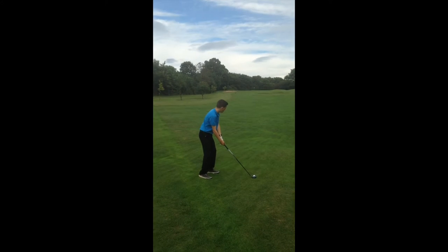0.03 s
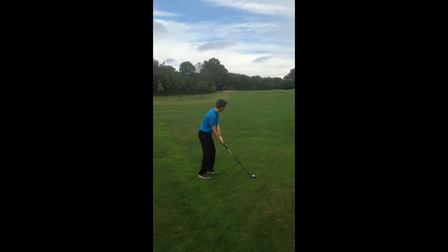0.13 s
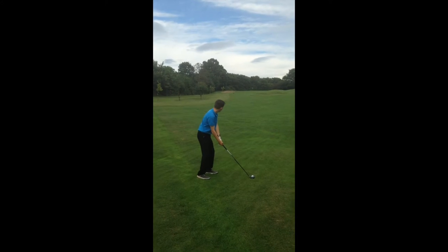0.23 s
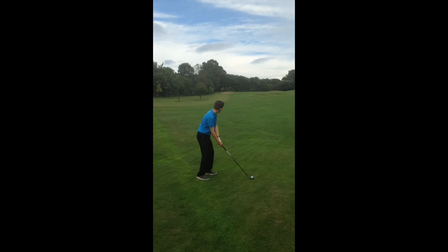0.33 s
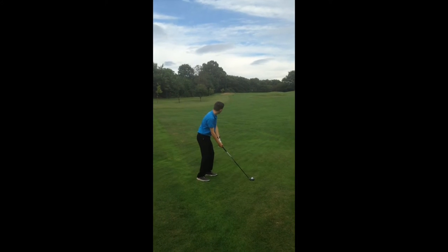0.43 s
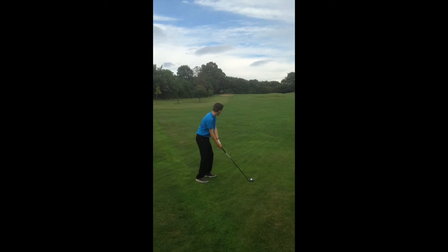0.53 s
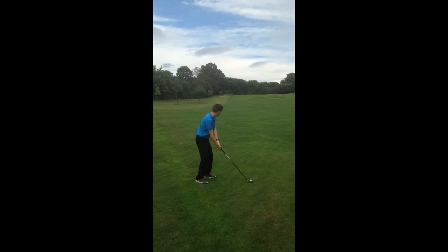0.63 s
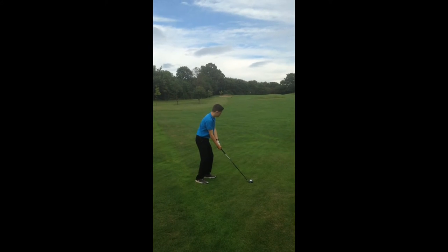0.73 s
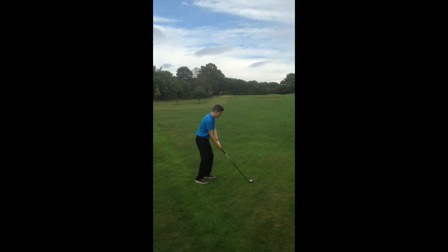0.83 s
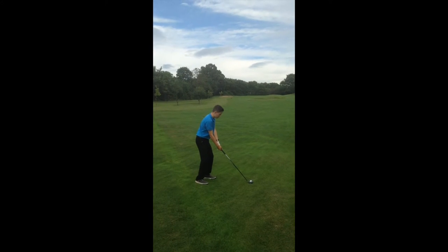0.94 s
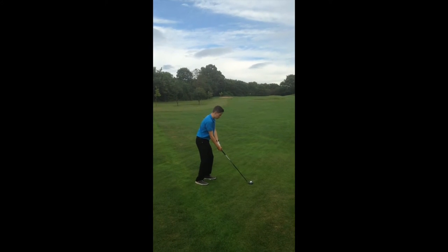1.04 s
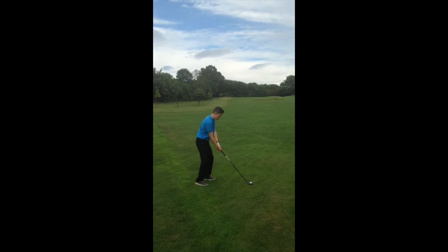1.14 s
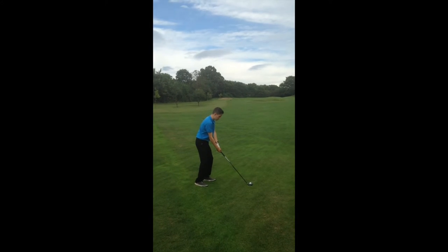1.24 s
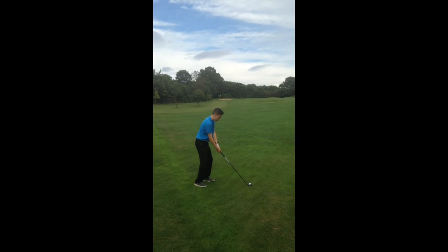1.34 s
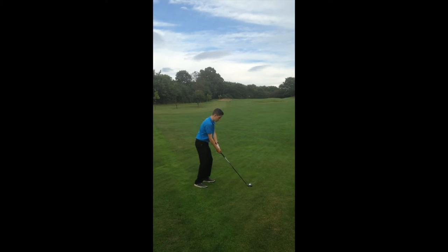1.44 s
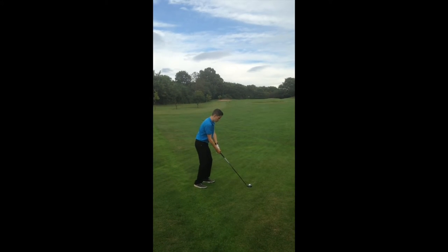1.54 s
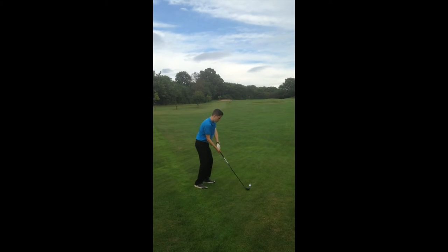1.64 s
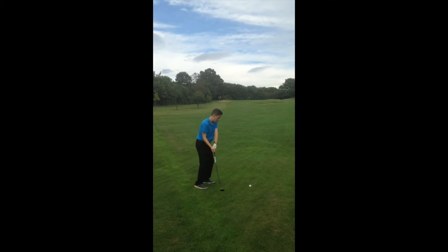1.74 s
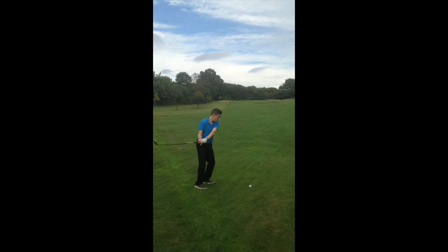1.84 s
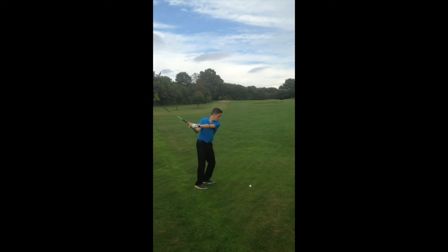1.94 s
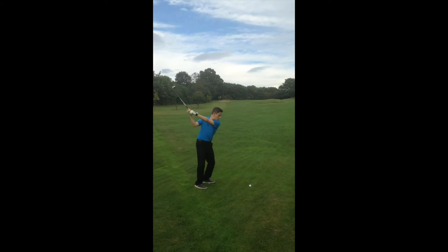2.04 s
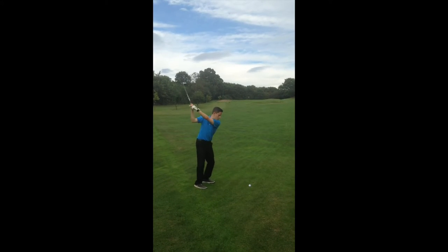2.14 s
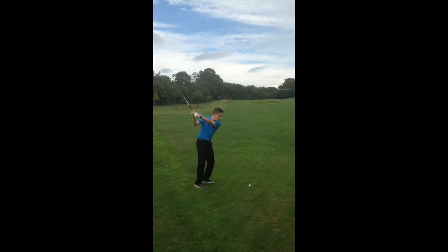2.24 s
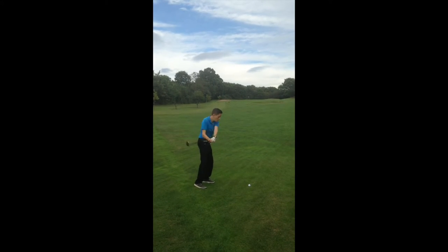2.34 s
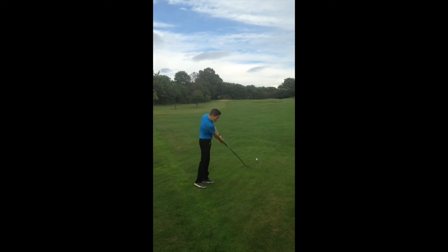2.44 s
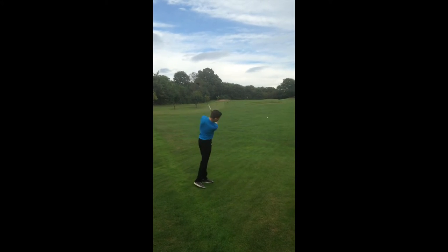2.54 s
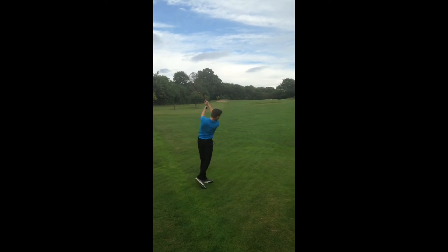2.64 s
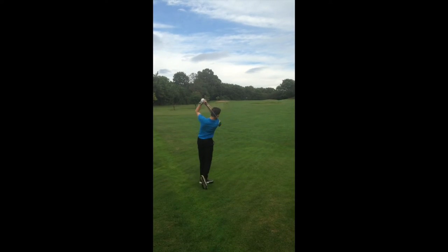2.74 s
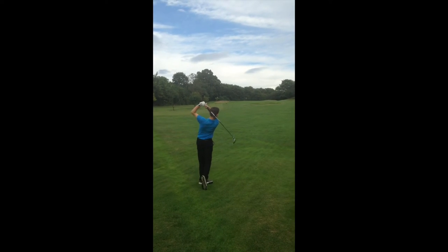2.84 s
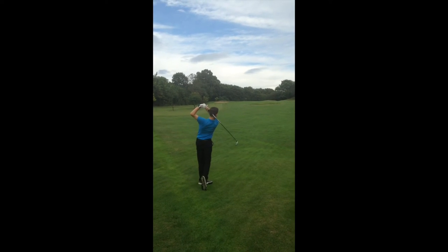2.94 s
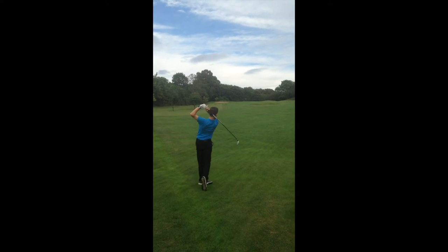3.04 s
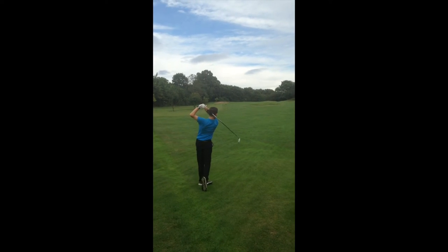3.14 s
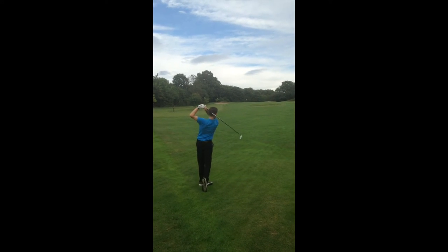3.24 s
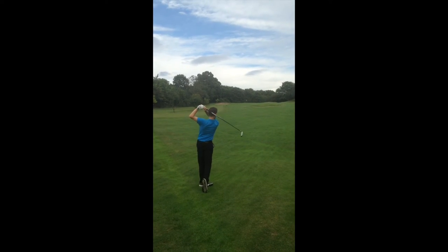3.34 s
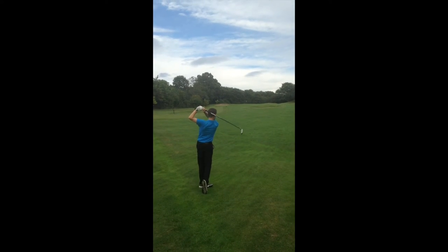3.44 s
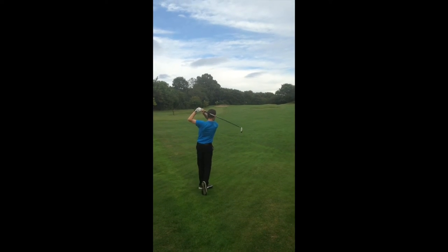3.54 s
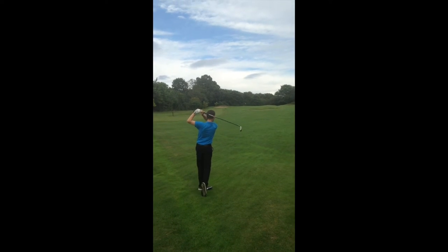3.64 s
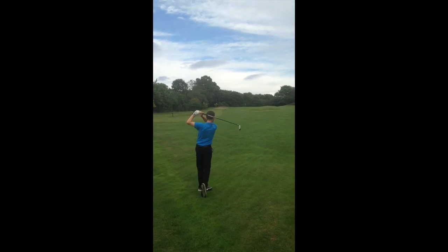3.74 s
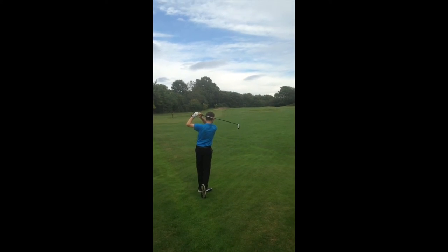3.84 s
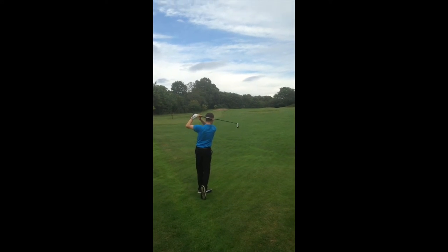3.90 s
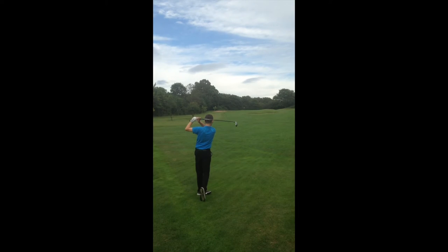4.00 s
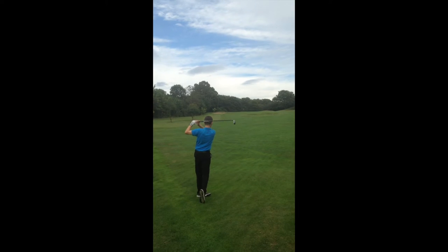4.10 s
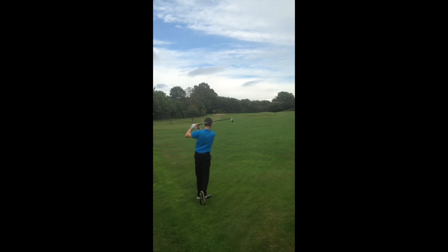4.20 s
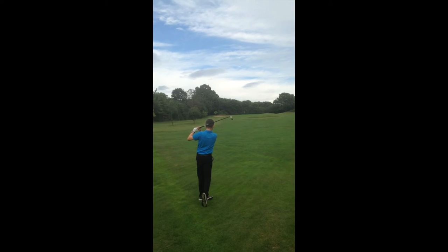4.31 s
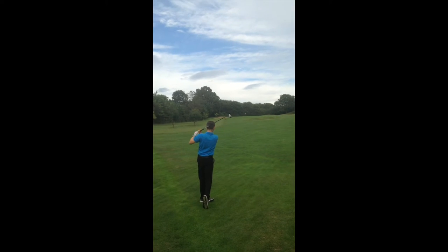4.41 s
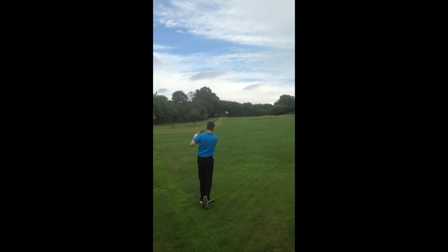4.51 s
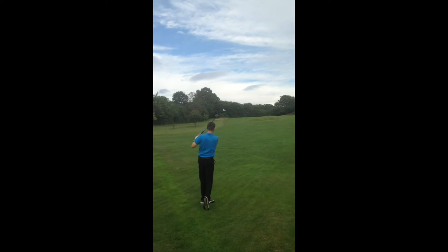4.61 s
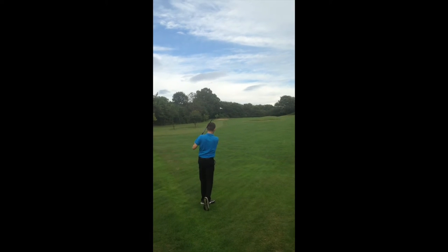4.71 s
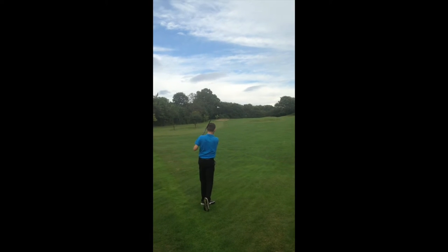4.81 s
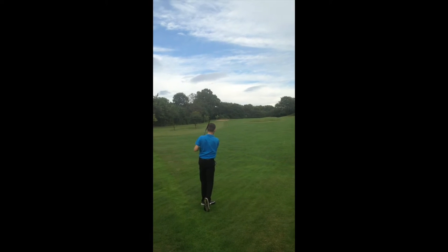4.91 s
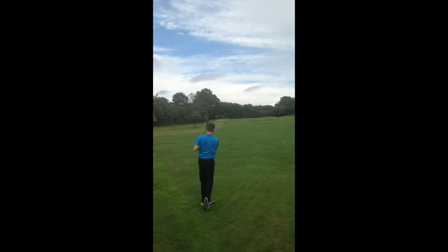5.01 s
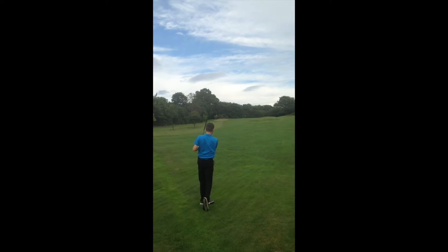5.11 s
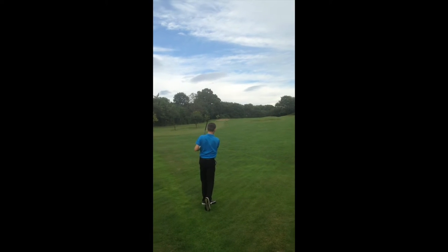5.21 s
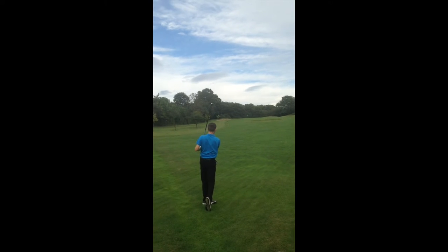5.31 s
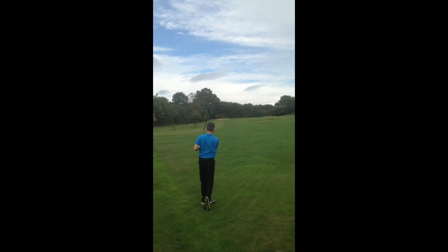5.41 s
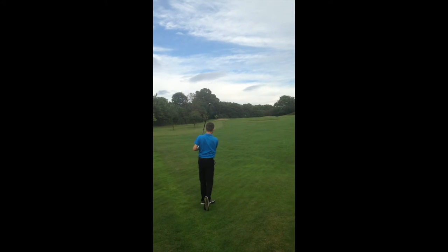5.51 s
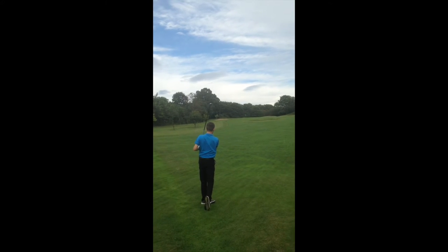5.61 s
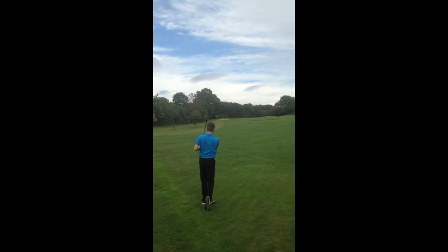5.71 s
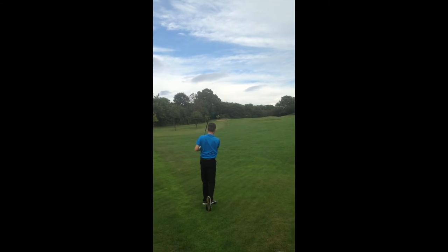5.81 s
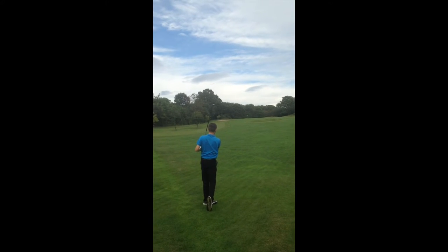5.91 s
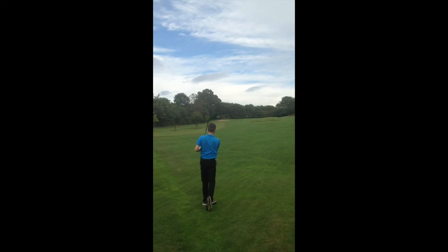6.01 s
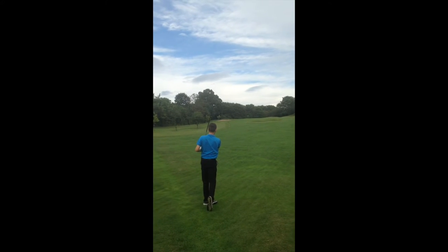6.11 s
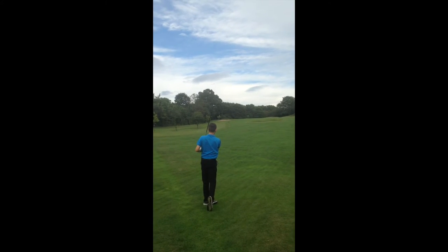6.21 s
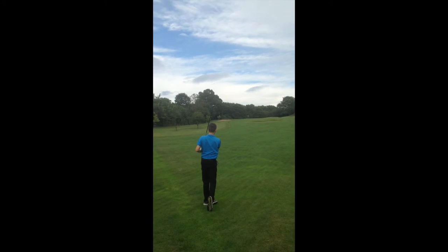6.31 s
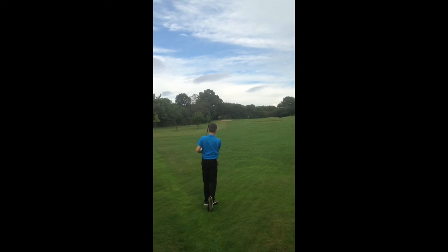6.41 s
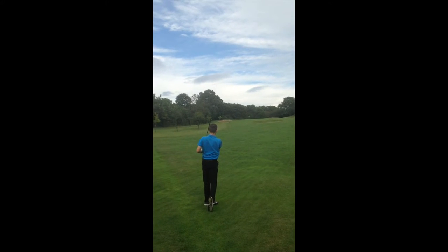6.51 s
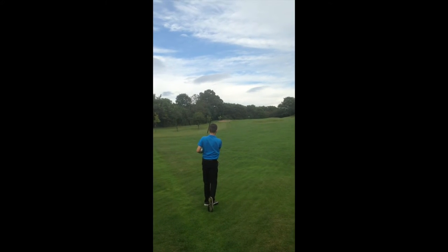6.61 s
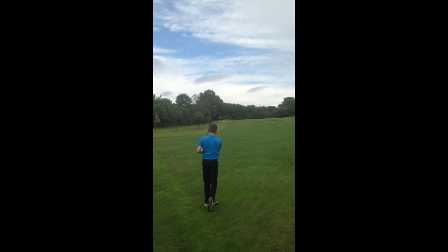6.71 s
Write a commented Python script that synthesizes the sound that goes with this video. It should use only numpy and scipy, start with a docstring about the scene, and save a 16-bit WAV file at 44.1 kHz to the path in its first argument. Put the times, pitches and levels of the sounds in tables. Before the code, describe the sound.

Outdoors on an open fairway, a distant mower drones low with a wavering, fluttering rattle. Clothing rustles faintly, then a short swish leads into one very sharp, bright click of iron on ball with a tiny metallic ring. A whisper of torn grass follows. The mower recedes while the hand-held phone, a few metres away, picks up soft bumps.

```python
"""Iron shot on an open fairway

A golfer hits one iron shot a few metres from a hand-held phone. Air noise swells into a swish, the ball
is a sharp pressure swing with short noise bursts, the club head rings as decaying sines, and grainy noise
makes the rustling sleeves, the faint turf spray and a bright tail. Far off, a four-cylinder mower drones
and turns away: wavering engine lines, rumble and repeating clatter, its upper sounds swelling on the breeze.
Gusts of noise stir the trees, faint bright ticks sound, and the phone is softly bumped and gripped."""
import sys
import numpy as np
from scipy import signal
from scipy.fft import rfft, irfft
from scipy.io import wavfile
from scipy.ndimage import uniform_filter1d

SR = 44100
rng = np.random.default_rng(int(sys.argv[2]) if len(sys.argv) > 2 else 0)


def waveform_to_disk(signal):
    """Save audio, clipped to [-1, 1], as 16-bit WAV at the path in sys.argv[1]."""
    frames = np.transpose(np.atleast_2d(signal))
    scaled = np.clip(frames, -1, 1) * 32767
    samples = np.round(scaled).astype(np.int16)
    wavfile.write(sys.argv[1], SR, samples)


N = 297675

# Mower engine speed: (time [s], firing rate [Hz])
ENGINE_SPEED = [(0, 74.2), (1, 73.68), (1.5, 73.46), (2, 73.14), (3.2, 72.92), (4, 72.54), (5.5, 72.28),
                (6, 72.14), (6.75, 71.8)]
# Engine lines, on quarter multiples too because the four cylinders fire unequally:
# (multiple of firing rate [ratio], relative level facing us [dB], relative level turned away [dB])
ENGINE_LINES = [(1, -2.5, -7), (1.25, -16, -15.5), (1.75, -15.5, -11), (2, 0, 1), (2.25, -12.5, -12),
                (3, -1.5, -15), (3.25, -15, -20.5), (3.75, -15, -12.5), (4, -11, -9.5), (4.75, -17.5, -28),
                (5, -13.5, -24.5), (5.25, -17.5, -23), (5.5, -23, -12.5), (6, -27, -9.5),
                (6.5, -12.5, -12.5), (6.75, -10.5, -16), (7, -5, -9), (7.5, -17.5, -5), (7.75, -26.5, -12),
                (8, -9, -6), (8.5, -10, -19.5), (8.75, -18.5, -24.5), (9, -17, -18.5), (9.25, -23, -15.5),
                (9.5, -13, -7.5), (9.75, -21, -17), (10, -14, -12), (10.5, -13, -18), (10.75, -10, -17.5),
                (11, -24, -23), (11.5, -25.5, -20), (11.75, -16.5, -18), (12, -21.5, -19.5),
                (13.5, -17, -27.5)]
# Gain of the low exhaust drone, which fades and returns: (time [s], gain [dB])
EXHAUST_GAIN = [(0, -50.5), (.7, -51.5), (1.25, -53), (2.3, -53), (2.92, -50.5), (3.2, -58), (3.55, -55),
                (3.9, -70.5), (4.35, -62), (4.55, -55), (6.15, -55.5), (6.27, -66), (6.75, -66.5)]
# How well the breeze carries the mower's upper sounds: (time [s], lift before the carry factors [dB])
BREEZE_LIFT = [(0.0, -0.5), (0.2, 2.5), (0.45, -1.7), (0.76, -5.5), (0.9, -2), (1.02, 1.5), (1.2, -1.2),
               (1.45, 0.2), (1.95, 0.5), (2.25, 1.9), (2.42, 4), (2.88, 2.5), (3.28, -2.2), (3.76, 4),
               (3.92, -0.1), (4.08, 2.3), (4.38, -1.5), (4.68, -1), (4.85, 3.5), (5.2, 2.5), (5.5, 0.4),
               (5.62, 0.8), (6.3, -2.5), (6.5, 3), (6.75, -1)]
# Mower clatter, spectrum: (frequency [Hz], relative density [dB per Hz])
CLATTER_COLOUR = [(250, -15.5), (480, 4.5), (780, 4), (1020, 2), (1150, -1.5), (1400, 0.5), (1750, -6),
                  (2050, -6.5), (2400, -6.5), (2900, -11), (3400, -16), (5000, -41), (9000, -52)]
# Dull rumble of mower and shifting grip, spectrum: (frequency [Hz], relative density [dB per Hz])
RUMBLE_COLOUR = [(20, -21), (40, -5.5), (58, 5), (110, 3.5), (165, -2), (230, -2.5), (420, -13), (800, -46),
                 (4000, -84.5)]
# Distant open air, spectrum: (frequency [Hz], relative density [dB per Hz])
AIR_COLOUR = [(30, -8.5), (150, -15), (600, 9.5), (1200, -5), (2500, -7), (4000, -10.5), (6300, -15.5),
              (10000, -22.5), (15000, -32.5)]
# Soft bumps of the hand on the phone:
# (time [s], peak level [dB], half width [s], level of the case's dull knock [dB])
HAND_BUMPS = [(.091, -35, .0013, -56), (.132, -34, .0016, -59), (3.7243, -33, .0011, -45),
              (3.945, -45, .0015, -54), (4.0478, -36, .0031, -50), (4.0523, -43, .0009, -48),
              (4.0592, -39, .0008, -46), (4.0644, -37, .0005, -50), (4.0654, -31, .0016, -38.5),
              (4.0680, -36, .0042, -60), (4.0715, -35, .0014, -48), (4.0805, -39, .0025, -54),
              (4.0875, -45, .002, -56), (4.272, -46, .0016, -55)]
# The phone's case under the fingers: (frequency [Hz], level relative to the knock [dB], t60 [s])
CASE_RESONANCES = [(325, 0, .045), (420, -5, .025), (546, -4, .02), (630, -7, .02)]
# Low rumbles as the hand shifts its grip: (time [s], level [dB], rise and fall time constant [s])
GRIP_SHIFTS = [(.1, -61, 0.045), (.6, -55, 0.038), (.79, -52, 0.043), (3.25, -51.5, 0.081),
               (3.75, -57, 0.12), (6.5, -64, 0.07)]
# Gusts in the far trees: (time [s], level [dB], rise and fall time constant [s])
TREE_GUSTS = [(.17, -60, .1), (4.98, -64.5, .3), (6.5, -70, .12)]
# Rushing leaves, spectrum: (frequency [Hz], relative density [dB per Hz])
LEAF_COLOUR = [(400, -13), (900, 2), (1450, 0), (2000, -12.5), (3200, -18), (6000, -36), (15000, -60)]
# Faint short bursts of bright noise: (time [s], starting level [dB], centre frequency [Hz], t60 [s])
BRIGHT_TICKS = [(.187, -66, 6000, .025), (.943, -73, 7300, .03), (2.755, -68, 12500, .012),
                (2.769, -67, 12500, .012), (2.782, -73, 12500, .012)]
# Sleeves at address, on the backswing and as the club is lowered:
# (time [s], level [dB], rise and fall time constant [s])
SLEEVE_RUSTLES = [(.19, -62, 0.038), (.39, -68, 0.26), (1.07, -66.5, 0.11), (1.54, -67, 0.042),
                  (1.98, -62.5, 0.15), (3.66, -66, 0.098), (4.85, -69.5, 0.046), (5.1, -70.5, 0.13),
                  (5.62, -72.5, 0.068), (6.5, -76, .06)]
# Creasing cloth, spectrum: (frequency [Hz], relative density [dB per Hz])
SLEEVE_COLOUR = [(700, -3.5), (1500, 1), (2300, 9), (2900, 1), (3600, -17.5), (7000, -32), (15000, -48.5)]
# Air round the club, spectrum: (frequency [Hz], relative density [dB per Hz])
SWISH_COLOUR = [(60, -32), (200, -6.5), (600, 5), (1500, 2), (3000, -7), (7000, -10.5), (11000, -11.5),
                (15000, -24)]
# Bright noise of the snap and the tail, spectrum: (frequency [Hz], relative density [dB per Hz])
BRIGHT_COLOUR = [(1500, -6), (2600, -2), (3300, -7), (4300, -1), (7000, 0), (8500, -4), (11000, -4),
                 (14000, -6), (15500, -22)]
# Sole cutting the turf, spectrum: (frequency [Hz], relative density [dB per Hz])
CRACK_COLOUR = [(40, -30), (200, -14), (500, -8), (1400, -4), (2600, -1), (3400, -8), (4300, -5),
                (5000, -9), (7200, -9), (8500, -13), (12500, -16), (15000, -27)]
# Ring of club head and ball:
# (frequency [Hz], peak level [dB], t60 [s], time the ring holds up before it dies [s])
CLUB_RESONANCES = [(2620, -35, .018, 0), (2880, -41, .03, 0), (3380, -44, .022, 0),
                   (4010, -23.3, .011, .0007), (4300, -43.5, .02, 0), (4950, -22, .005, 0),
                   (5795, -36, .04, 0), (6090, -42.5, .025, 0), (6800, -25.5, .006, 0),
                   (7200, -25, .007, 0), (7950, -35.5, .02, 0), (9150, -30.5, .012, 0),
                   (9211, -47, .045, .018), (9287, -37, .04, .023), (9341, -47.5, .045, .023),
                   (9480, -45, .04, .014), (9850, -39, .015, 0), (11140, -46, .04, 0),
                   (12280, -35, .036, 0), (12900, -39, .016, 0)]
# Torn grass, spectrum: (frequency [Hz], relative density [dB per Hz])
TURF_COLOUR = [(100, -30.5), (400, 10.5), (1200, -9), (2300, 10), (3600, -3), (4600, 5), (5400, -3.5),
               (6200, 1), (7200, -7), (10000, -14), (15000, -21)]

TURN_S, TURN_LENGTH_S = 2.87, 0.5  # middle of the mower's turn and its time constant
WHINE_DB, CLATTER_DB, RUMBLE_DB = -54, -60.5, -55.5  # gains at the start, in still air
RECEDE_DB_PER_S, RUMBLE_RECEDE_DB_PER_S = 1.36, 0.38  # the mower draws away; its bass fades more slowly
WHINE_CARRY, CLATTER_CARRY = 1, 1.25  # dB gained per dB of breeze lift
GRAIN_T60_S = .006  # one grain of noise
IMPACT_S, PUSH_S = 2.4906, .000143  # start of the strike; time scale of the squash
TOP_HZ = 15300  # upper limit of the phone


def undb(db):
    """Decibels to gain."""
    return 10 ** (np.asarray(db) / 20)


def clock():
    """Time of every sample in seconds."""
    return np.arange(N) / SR


def curve(table):
    """The second column of a table, joined by straight lines in time."""
    times, values = np.transpose(table)
    return np.interp(clock(), times, values)


def noise(colour):
    """Noise of rms 1 with the given spectrum."""
    hz, db = np.transpose(colour)
    bins = np.maximum(np.fft.rfftfreq(N, 1 / SR), 1)
    gain = undb(np.interp(np.log(bins), np.log(hz), db))
    y = irfft(rfft(rng.standard_normal(N)) * gain, N)
    return y / y.std()


def walk(rate):
    """Smooth chance with spread 1 that changes about rate times a second."""
    steps = rng.standard_normal(2048)
    joined = np.interp(clock() * rate, np.arange(len(steps)), steps)
    y = uniform_filter1d(joined, int(SR / rate / 2) + 1)
    return y / y.std()


def swell(peak_s, rise_s, fall_s):
    """An envelope that grows and fades exponentially around its peak."""
    t = clock() - peak_s
    return np.exp(np.minimum(t / rise_s, -t / fall_s))


def swells(table):
    """The envelopes of all the events in a table, added up."""
    return sum(undb(db) * swell(s, length, length) for s, db, length in table)


def fade(t, t60):
    """A free decay that loses 60 dB in t60 seconds."""
    return np.exp(-np.log(1000) * t / t60)


def grains(rate, spread_db):
    """A ragged envelope of rms 1: on average rate tiny grains a second, each of its own size."""
    sizes = (rng.random(N) < rate / SR) * undb(spread_db * rng.standard_normal(N))
    y = signal.lfilter([1], [1, -fade(1 / SR, GRAIN_T60_S)], sizes)
    return y / np.sqrt(np.mean(y ** 2))


def engine_band(lowest, highest):
    """The engine lines between two multiples of the firing rate."""
    return [row for row in ENGINE_LINES if lowest <= row[0] < highest]


def engine_lines(orders, phase, smear, flutter, flutter_rate, wander):
    """Engine orders whose balance shifts as the mower turns; moving air makes each one flutter."""
    turned = .5 + .5 * np.tanh((clock() - TURN_S) / TURN_LENGTH_S)
    out = np.zeros(N)
    for order, facing_db, away_db in orders:
        lag = smear * order ** 2  # the long way over the grass spreads each firing out in time
        uneven = rng.uniform(0, 2 * np.pi) * (order % .5 > 0)  # the four cylinders fire unequally
        angle = order * phase + lag + uneven + wander * walk(flutter_rate)  # wander in radians
        level = undb(facing_db + turned * (away_db - facing_db))
        out += level * (1 + flutter * walk(flutter_rate)) * np.cos(angle)
    return np.sqrt(2) * out


def exhaust(phase):
    """Low firing pulses: the engine orders below 4.5, wavering gently."""
    lines = engine_lines(engine_band(0, 4.5), phase, smear=0.24, flutter=0.17, flutter_rate=7, wander=0.133)
    return undb(curve(EXHAUST_GAIN)) * lines


def whine(phase, breeze, receded_db):
    """The upper engine orders, which flutter strongly and ride on the breeze."""
    lines = engine_lines(engine_band(4.5, np.inf), phase,
                         smear=np.pi / 2, flutter=0.52, flutter_rate=12, wander=.6)
    return undb(WHINE_DB - receded_db + WHINE_CARRY * breeze) * lines


def repeating(x, cycle_s, memory, count=5):
    """Each turn of the crankshaft rattles much like the ones before it."""
    t = clock()
    y = np.zeros(N)
    for k in range(count):
        earlier = ((t - k * cycle_s) * SR).astype(int) % N
        y += memory ** k * x[earlier]
    return y / y.std()


def clatter(firing_hz, breeze, receded_db):
    """Rattling noise that repeats with the crankshaft and swells most on the breeze."""
    rattle = repeating(noise(CLATTER_COLOUR), 2 / firing_hz, memory=0.44)  # two firings a turn
    return undb(CLATTER_DB - receded_db + CLATTER_CARRY * breeze + walk(15)) * rattle


def rumble():
    """Unsteady low noise that recedes slowly with the mower."""
    level_db = RUMBLE_DB - RUMBLE_RECEDE_DB_PER_S * clock() + 2 * walk(9.6)
    return undb(level_db) * noise(RUMBLE_COLOUR)


def mower():
    """Exhaust and whine share one engine phase; clatter follows its speed and rumble lies beneath."""
    firing_hz = curve(ENGINE_SPEED)
    phase = 2 * np.pi * np.cumsum(firing_hz) / SR
    breeze = curve(BREEZE_LIFT)
    receded_db = RECEDE_DB_PER_S * clock()
    upper = whine(phase, breeze, receded_db) + clatter(firing_hz, breeze, receded_db)
    return exhaust(phase) + upper + rumble()


def open_air(early_db=-64, late_db=-66):
    """A distant, nearly even noise hiss that eases a little after the shot."""
    level_db = np.interp(clock(), [2.6, 3.6], [early_db, late_db]) + 0.14 * walk(2.7)
    return noise(AIR_COLOUR) * undb(level_db)


def handling():
    """Each bump is a dip in pressure with a rebound on either side, and knocks the case."""
    out = np.zeros(N)
    for s, db, width, knock_db in HAND_BUMPS:
        near = np.abs(clock() - s) < .1
        t = clock()[near] - s
        u = (t / width) ** 2
        out[near] -= undb(db) * (1 - u) * np.exp(-u / 2)
        after = np.maximum(t + width, 0)
        soft = 1 - np.exp(-(after / width) ** 2)  # flesh presses on gradually
        for hz, mode_db, t60 in CASE_RESONANCES:
            tone = fade(after, t60) * np.sin(2 * np.pi * hz * after)
            out[near] -= undb(knock_db + mode_db) * soft * tone
    return out


def grip():
    """The fingers shift on the phone with a soft, low rumble."""
    return noise(RUMBLE_COLOUR) * swells(GRIP_SHIFTS)


def trees():
    """Leaves rush softly as each gust passes: flickering noise under slow swells."""
    return noise(LEAF_COLOUR) * undb(0.91 * walk(18)) * swells(TREE_GUSTS)


def bright_ticks():
    """Faint short bursts of bright noise that start at once and decay."""
    out = np.zeros(N)
    for s, db, hz, t60 in BRIGHT_TICKS:
        t = np.maximum(clock() - s, 0)
        burst = noise([(hz / 2, -30), (hz, 0), (hz * 2, -45)])
        out += burst * undb(db) * fade(t, t60) * (t > 0)
    return out


def sleeves():
    """Cloth creases in many tiny grains as the golfer moves."""
    return noise(SLEEVE_COLOUR) * grains(rate=1500, spread_db=-0.5) * swells(SLEEVE_RUSTLES)


def swish(level_db=-54):
    """Air rushes round the club: noise that swells and dies around the strike."""
    return undb(level_db) * noise(SWISH_COLOUR) * swell(2.495, rise_s=0.041, fall_s=0.06)


def since_impact():
    """Seconds since the club met the ball, zero before."""
    return np.maximum(clock() - IMPACT_S, 0)


def contact():
    """How far the club has come into contact, rising from 0 to 1."""
    return np.clip(since_impact() / (4 * PUSH_S), 0, 1)


def click(level_db=-7.7, low_cut_hz=560, echo_db=-20, echo_s=.0029):
    """The ball is squashed and springs off: the air feels the rate of change of the contact force."""
    t = since_impact()
    squash = (t - 3 * PUSH_S) / PUSH_S
    swing = undb(level_db) * squash * np.exp((1 - squash ** 2) / 2) * (t > 0)
    # a small body radiates little bass
    direct = signal.sosfilt(signal.butter(1, low_cut_hz, "high", fs=SR, output="sos"), swing)
    echo = undb(echo_db) * np.interp(clock() - echo_s, clock(), direct)  # off the golfer's legs
    return direct + echo


def first_touch(level_db=-13.5, hz=5600, t60=.0016):
    """A very short bright tone opens the contact."""
    t = since_impact()
    return undb(level_db) * fade(t, t60) * np.sin(2 * np.pi * hz * t)


def snap(level_db=-18, t60=.0025):
    """Grooves bite the ball's cover with a very short burst of bright noise."""
    t = since_impact()
    return undb(level_db) * fade(t, t60) * noise(BRIGHT_COLOUR) * (t > 0)


def crack(level_db=-30.5, t60=.031):
    """The sole cuts the turf with a short burst of noise."""
    return undb(level_db) * fade(since_impact(), t60) * noise(CRACK_COLOUR) * contact()


def thud(level_db=-53, hz=170, t60=.04):
    """The sole meets the soil, a low decaying tone."""
    t = since_impact()
    return undb(level_db) * fade(t, t60) * np.sin(2 * np.pi * hz * t)


def ring():
    """Club head and ball sound their resonances; some hold up before they die."""
    t = since_impact()
    out = np.zeros(N)
    for hz, db, t60, hold in CLUB_RESONANCES:
        tone = np.sin(2 * np.pi * hz * (t - 2 * PUSH_S))
        out -= undb(db) * fade(np.maximum(t - hold, 0), t60) * tone
    return out * contact()


def strike():
    """Click, touch, snap, turf crack, soil thud and ring all start from one impact."""
    return click() + first_touch() + snap() + crack() + thud() + ring()


def turf(level_db=-60):
    """Torn grass sprays after the club in ragged grains of noise."""
    spray = grains(rate=2500, spread_db=3.5)
    return undb(level_db) * spray * noise(TURF_COLOUR) * swell(2.64, rise_s=0.053, fall_s=0.053)


def bright_tail(level_db=-73):
    """Faint bright grainy noise swells and fades after the strike."""
    ragged = grains(rate=2000, spread_db=3)
    return undb(level_db) * ragged * noise(BRIGHT_COLOUR) * swell(2.71, rise_s=0.07, fall_s=0.075)


def scene():
    """Everything on the fairway, heard in mono."""
    background = mower() + open_air() + trees() + bright_ticks()
    phone = handling() + grip()
    golfer = sleeves() + swish() + strike() + turf()
    return (background + phone + golfer + bright_tail())[None]


def record(dry):
    """The phone thins the deep bass and cuts the top."""
    thin = signal.sosfilt(signal.butter(1, 18, "high", fs=SR, output="sos"), dry)
    return signal.sosfilt(signal.ellip(10, .2, 70, TOP_HZ, fs=SR, output="sos"), thin)


dry = scene()
out = record(dry)
waveform_to_disk(out)
```